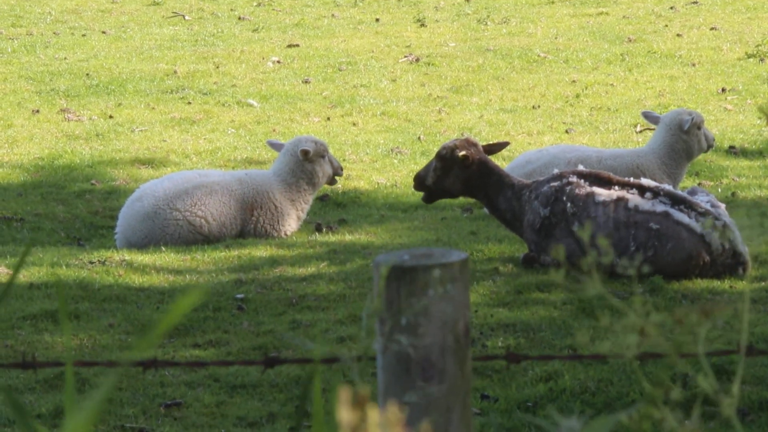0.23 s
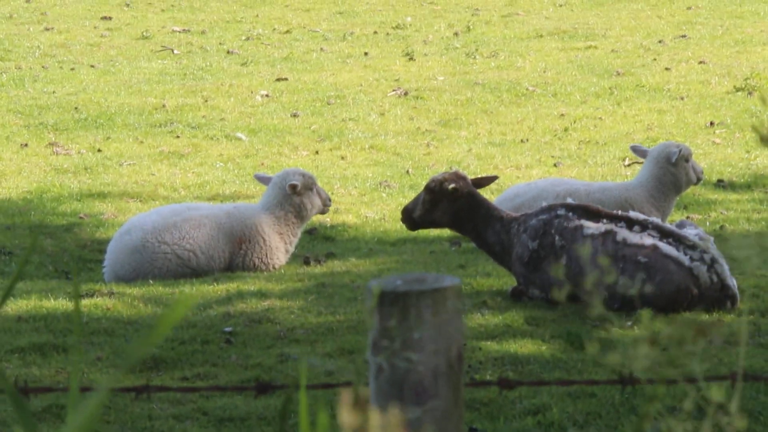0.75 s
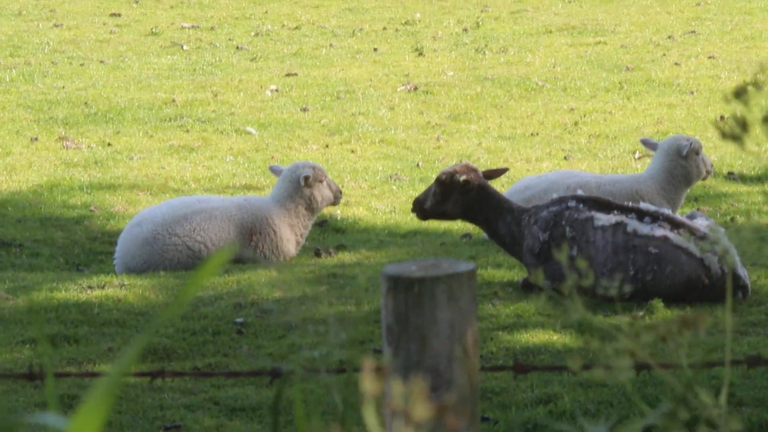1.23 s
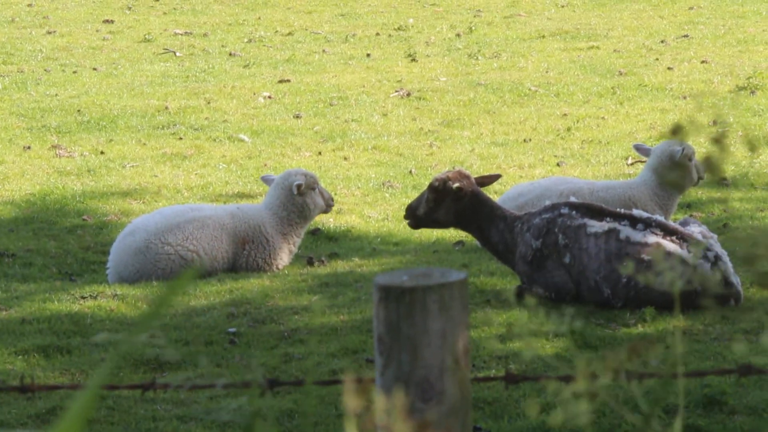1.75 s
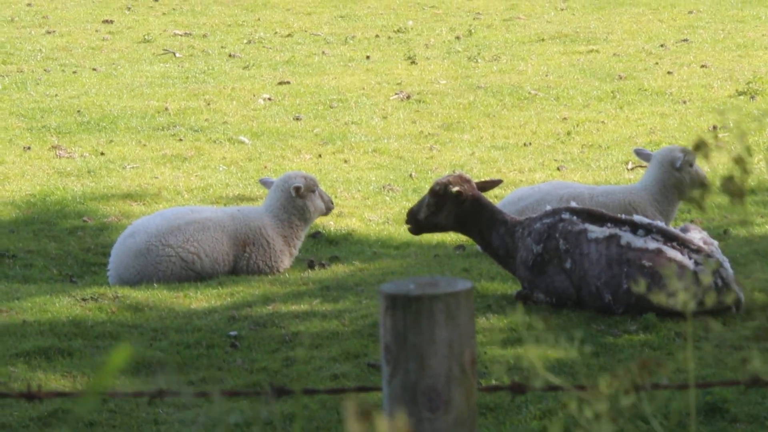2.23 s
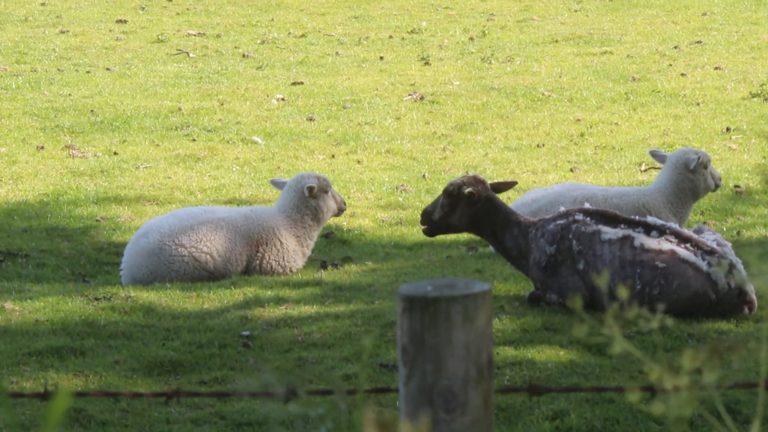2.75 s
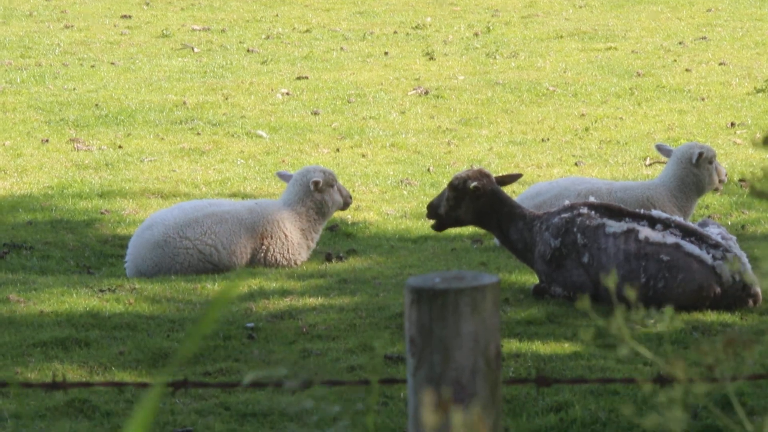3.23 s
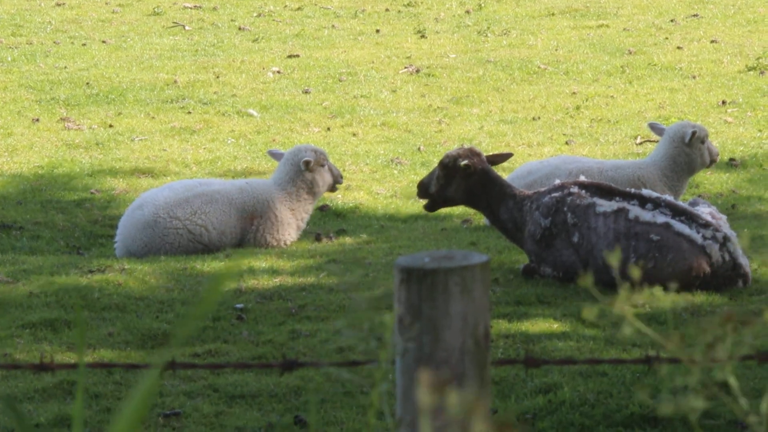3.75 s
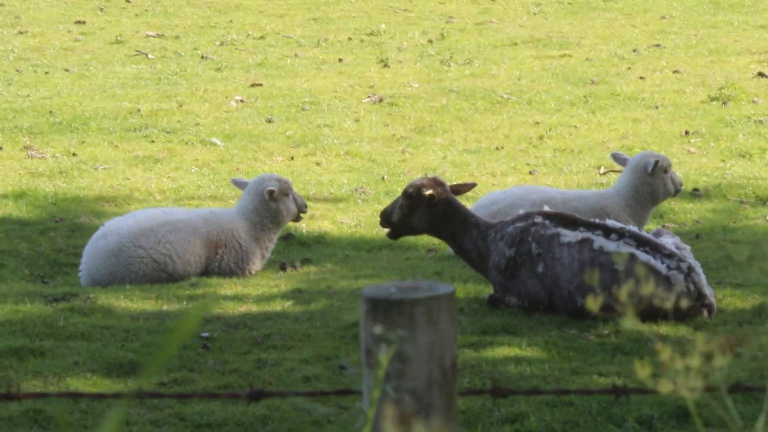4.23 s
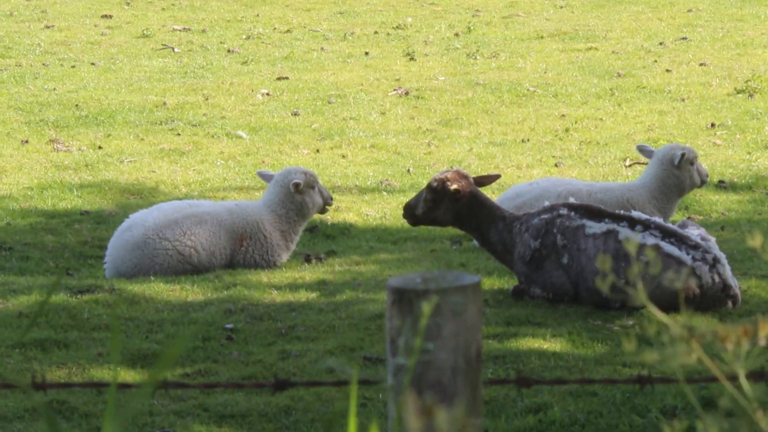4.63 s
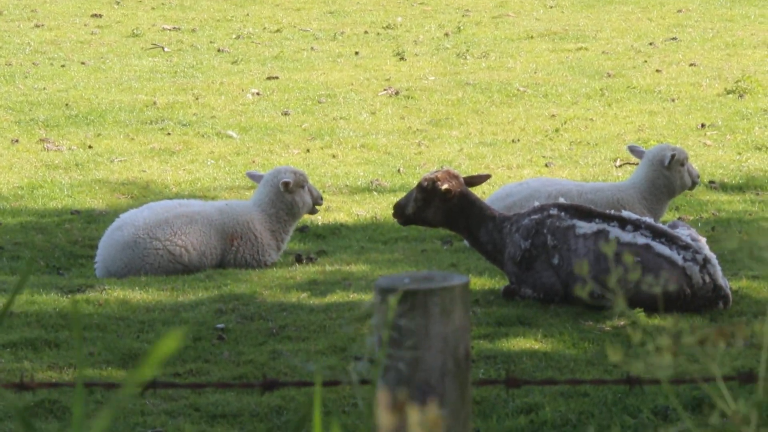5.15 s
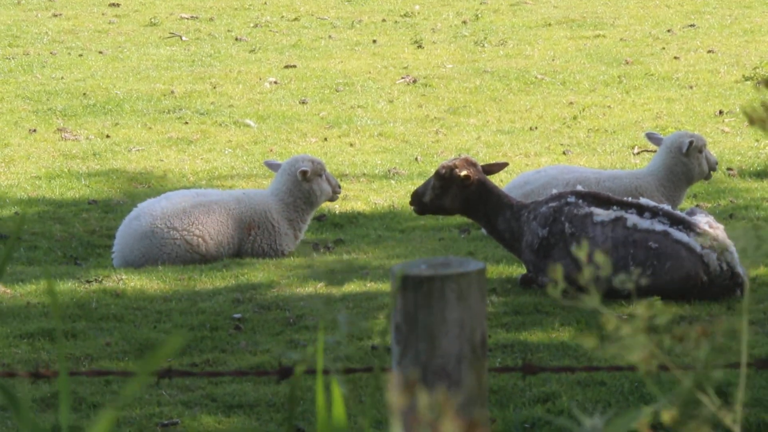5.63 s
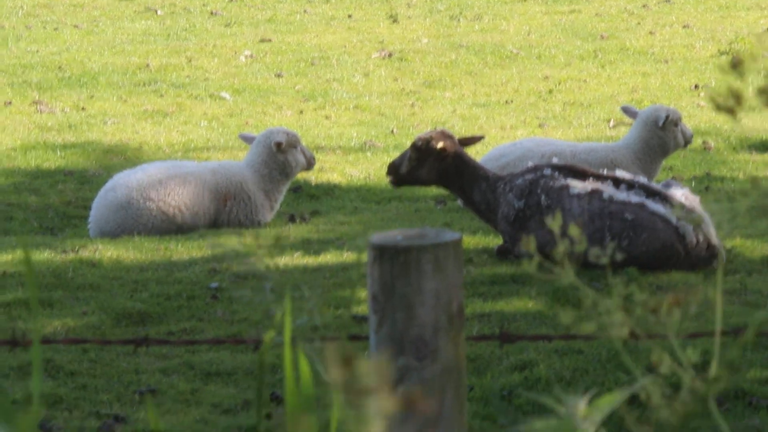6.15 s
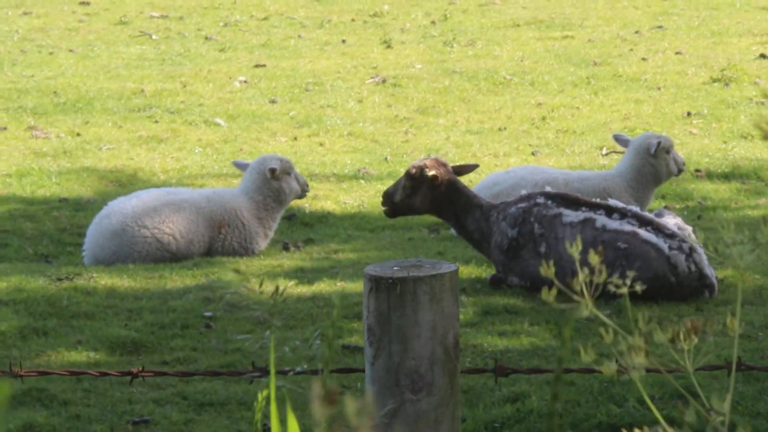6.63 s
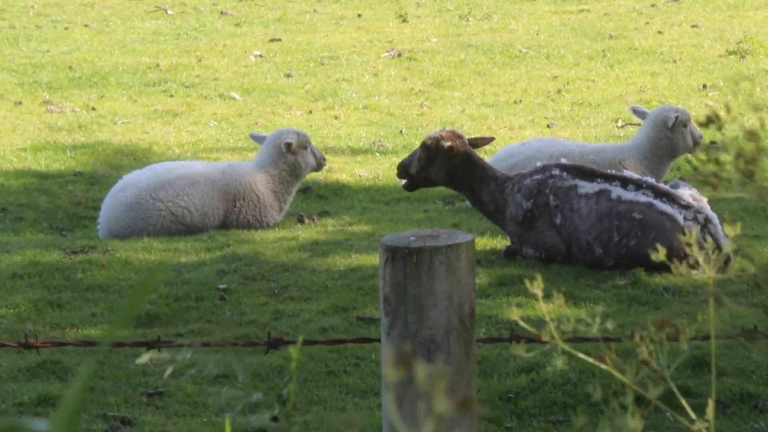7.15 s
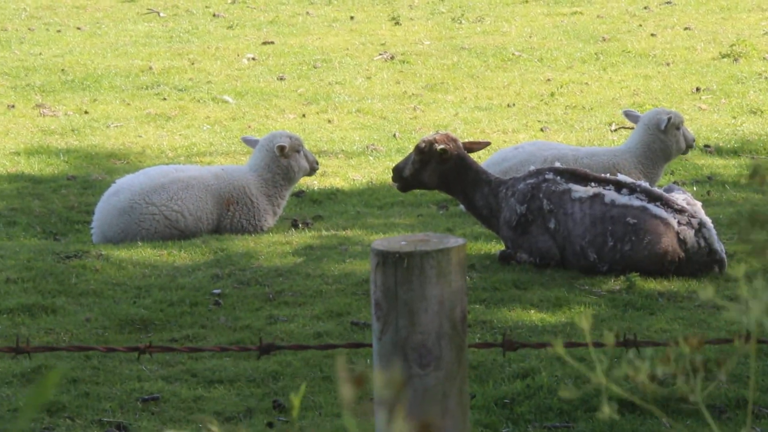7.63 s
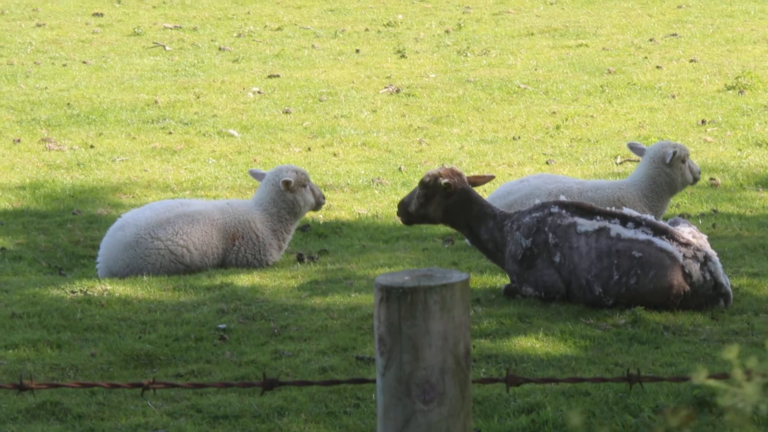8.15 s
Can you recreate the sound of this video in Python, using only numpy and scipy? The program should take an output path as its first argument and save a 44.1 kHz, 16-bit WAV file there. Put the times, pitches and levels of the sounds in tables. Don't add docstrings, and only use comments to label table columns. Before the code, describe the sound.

Outdoor stereo ambience close to an exposed small microphone. At first only low leafy rustle, light wind bumps and very faint chirps; then rough low-to-mid wind buffeting bursts in, irregular and sometimes overloading, with brief gaps. Clear thrush notes and thin trills from distant birds surface in the lulls mid-way. Later gusts crowd together and end in one long roaring blast while the field hiss sinks beneath it.

```python
import sys
import numpy as np
from scipy import signal
from scipy.fft import rfft, irfft, next_fast_len
from scipy.io import wavfile
from scipy.ndimage import uniform_filter1d, map_coordinates

SR = 44100
rng = np.random.default_rng(int(sys.argv[2]) if len(sys.argv) > 2 else 0)


def transcribe(signal):
    frames = np.atleast_2d(signal).T
    limited = np.clip(frames, -1, 1)
    pcm = np.round(limited * 32767).astype(np.int16)
    wavfile.write(sys.argv[1], SR, pcm)


def rack_gain(trim_db):
    fader = np.asarray(trim_db, float)
    return 10 ** (fader / 20)


N = 369999

# start_s, buffet_centre_hz at the reference strength, steady_flow_db between puffs
AIR = [(0, 386, -46), (.97, 305, -60), (2.1, 372, -52.5), (2.4, 253, -33), (2.51, 342, -36),
       (2.62, 475, -41), (3.1, 556, -35), (3.4, 462, -20), (3.6, 507, -32), (4.2, 395, -26.5),
       (4.9, 480, -26), (5.25, 358, -26), (5.65, 481, -52), (5.9, 402, -68), (6.7, 570, -17.5),
       (7.45, 417, -31), (7.95, 674, -30), (8.39, 810, -35)]
# full_strength_s, hold_s, level_db, left_right_db
PUFFS = [(0, .005, -43.5, 19), (.115, 0.013, -37.5, 8), (0.663, 0.02, -38.5, -6), (0.82, .005, -34, 6),
         (0.948, 0.036, -27, 0), (1.103, .005, -34.5, 1), (2.126, .005, -36, -8), (2.399, 0.14, -16.5, -1),
         (2.734, 0.088, -17.5, 5), (2.818, 0.47, -19, 3), (3.462, 0.15, -19, 0), (3.72, 0.019, -27, 0),
         (3.862, 0.025, -22, 0), (4.069, 0.02, -23, 6), (4.349, 0.19, -19.5, 3.5), (4.798, .12, -19, 0),
         (5.07, 0.0056, -16.5, 3), (5.193, 0.036, -23, 2.5), (5.371, .005, -27, -3),
         (5.463, 0.13, -20, -1.5), (5.599, 0.099, -17, -2.5), (5.818, .005, -21.5, -1),
         (5.943, 0.079, -16.5, 1.5), (6.112, .005, -30, -1), (6.22, 0.43, -18, -1), (6.635, .06, -25, 0),
         (6.885, 0.041, -23, 8), (6.974, 0.12, -19, -1.5), (7.21, 0.021, -22, 3), (7.536, 1, -17.5, 2)]
RISE_DB_PER_S, FALL_DB_PER_S = 198, 176
REFERENCE_DB, BRIGHTER_PER_DB = -19.5, .025
# full_depth_s, hold_s, depth_db
DUCKS = [(2.425, 0.12, 6), (2.772, 0.26, 13.5), (3.461, .005, 10.5), (3.567, 0.055, 7), (4.422, 0.078, 5.5),
         (4.907, .005, 3.5), (5.09, 0.0045, 7), (5.643, 0.066, 10.5), (6.051, 0.0083, 9.5),
         (6.464, 0.085, 7.5), (6.577, 0.0069, 13), (6.656, 0.19, 14), (7.066, 0.036, 9), (7.634, .005, 6.5),
         (7.737, .2, 15.5), (7.978, 0.53, 22), (8.28, .15, 20)]
DUCK_ATTACK_S, DUCK_RELEASE_S = 0.056, 0.051
RELEASE_PER_HOLD = 0.71
JOLT_HOLD_S, JOLT_ATTACK_S, JOLT_SHARE = .045, 0.0068, 0.58
# pitch_hz, level_db
EDDY = [(25, -66), (65, -22), (130, -8.5), (250, 0.5), (400, 2), (600, 1.5), (1000, -7.5), (1400, -19),
        (2000, -32), (3500, -60.5), (8000, -79), (20000, -100)]
# pitch_hz, level_db
LOW_CUT = [(20, -15), (60, -2.5), (110, 3.5)]
# pitch_hz for a centre of 500 Hz, burst_share
CLUMPED = [(100, 0.41), (250, 0.7), (600, 0.97), (1500, 1), (3000, 1)]
EVEN_DB, FLOWS_DB = 35, 14.5
FLICKER, FLICKERS_PER_S = 0.072, 110
# pitch_hz, left_right_likeness
PORTS_ALIKE = [(60, 0.99), (250, 0.94), (600, 0.22), (1500, 0.23)]
# middle_s, peak_db, left_right_db
SLAPS = [(2.389, -11, 21), (2.567, -12, -26), (2.718, -0.5, 27), (2.743, -3, -1), (3.104, 0, 16.5),
         (3.436, 9, -7), (3.449, 2.5, -9), (3.572, 5.5, 7.5), (3.614, -1, -22), (4.386, 3, 14),
         (4.425, -13, 25), (4.541, -1, 18), (5.033, 1.5, 27), (5.074, -2, 17), (2.51, -11, -20),
         (5.627, 0, 22), (5.684, -1, -40), (6.022, 1, -15), (6.241, -3.5, -3), (6.377, -4, 3),
         (6.412, 2, 12), (6.533, 2, -10), (6.674, 0, 10.5), (6.805, -1.5, -20), (7.052, 2, -10),
         (7.086, 1, -28), (7.259, -4, -5), (7.717, 1, 32), (7.878, -10, 12), (8.062, -8, 25)]
SLAP_SHARPER = 1.15
STRAY_OVER_DB, STRAY_SCATTER_DB, STRAY_PAN_DB = 9.5, 2, 13
STRAY_SINKS, WIND_ARRIVES_S = .12, 2.3
# start_s, length_s, first_pitch_hz, last_pitch_hz, level_db
THRUSH = [(3.3, 0.13, 1685, 1980, -43.5), (3.475, 0.14, 1756, 1927, -46.5),
          (3.755, 0.14, 1897, 2067, -39.5), (3.875, 0.086, 2090, 1950, -37),
          (4.155, 0.097, 2110, 1900, -40), (4.28, 0.085, 1846, 1810, -39.5), (4.46, 0.099, 2200, 2060, -51),
          (5.2, 0.12, 2090, 2140, -43.5), (5.335, .085, 1890, 1800, -39), (5.535, 0.028, 2110, 2030, -34.5)]
# start_s, length_s, first_pitch_hz, last_pitch_hz, level_db
WARBLE = [
    (5.27, .07, 2080, 1880, -40),
    (5.505, .13, 2180, 1900, -45),
]
# start_s, length_s, first_pitch_hz, last_pitch_hz, level_db
PIPING = [(.12, .05, 2410, 2450, -63), (.49, 0.11, 2000, 1810, -59), (.74, .04, 2600, 2510, -65),
          (.8, .05, 2510, 2560, -59), (.88, .05, 2550, 2510, -62), (4.955, 0.087, 2814, 2710, -48),
          (3.99, .03, 3950, 4120, -54), (4.88, .06, 3170, 3210, -58), (4.97, .07, 3190, 3130, -55)]
# start_s, length_s, first_pitch_hz, last_pitch_hz, level_db
SEEP = [
    (6.11, .07, 6950, 6870, -53),
]
ARCH, START_UNDER_DB, END_UNDER_DB = 1.005, 3, 3.5
# start_s, blip_db, slur_db
TRILL = [(3.2, -53, -53), (3.298, -47, -48), (3.392, -49, -49), (3.484, -55, -54), (3.662, -53, -58),
         (3.75, -47, -57), (3.85, -48, -58), (4.045, -56, -52)]
# after_start_s, pitch_hz
SYLLABLE = [
    [(-.008, 3370), (0, 3460), (.01, 3540)],
    [(.008, 2925), (.022, 2850), (.036, 2540)],
]
# pitch_hz, density_db per Hz
FIELD = [(25, -33), (100, -28), (260, -4.5), (700, -3.5), (1100, -5), (1500, -7.5), (3000, -11),
         (4700, -13.5), (5500, -18.5), (8000, -18.5), (9500, -22.5), (10800, -27), (13000, -27),
         (15600, -33)]
# pitch_hz, left_right_likeness
FIELD_ALIKE = [(60, .9), (300, 1), (1000, 0.37), (3000, 0.025)]
# pitch_hz, left_right_db
FIELD_TILT = [(100, 5.5), (2000, -2), (12000, -1.5)]
# start_s, added_db under 3 kHz
DRONE = [(0, 5), (1.1, 2), (2.2, 1), (5, 0.5), (8.39, -2)]
HISS_DB, HISS_STARTS_UNDER_DB, HISS_SWELL_S, HISS_SWELL_SHAPE = -49, 11, 2.72, 1.62
LEFT_RIGHT = np.array([[.5], [-.5]])


def air(t):
    centre_hz, steady_db = curves(AIR, t)
    start, hold, db, pan_db = np.transpose(PUFFS)
    before, after = plateaus(start, hold, t)
    power = rack_gain(2 * (db[:, None] - RISE_DB_PER_S * before - FALL_DB_PER_S * after))
    total = power.sum(0) + rack_gain(2 * steady_db)
    level_db = 10 * np.log10(total)
    hole_db = JOLT_SHARE * ducking(t, JOLT_ATTACK_S, JOLT_HOLD_S)
    brighter = np.exp(BRIGHTER_PER_DB * (level_db - REFERENCE_DB))
    return level_db - hole_db, centre_hz * brighter, pan_db @ power / total


def ducking(t, attack_s=DUCK_ATTACK_S, longest_s=np.inf):
    start, hold, depth_db = np.transpose(DUCKS)
    before, after = plateaus(start, hold, t)
    release_s = DUCK_RELEASE_S + RELEASE_PER_HOLD * hold[:, None]
    grip = np.maximum(1 - before / attack_s - after / release_s, 0)
    counted_db = depth_db * (hold < longest_s)
    return np.max(counted_db[:, None] * grip, 0)


def buffeting():
    t = np.arange(N) / SR
    grid = np.arange(0, N + 64, 64) / SR
    level_db, centre_hz, pan_db = [np.interp(t, grid, c) for c in air(grid)]
    ducked_db = np.interp(t, grid, ducking(grid))
    clumps_db = 3 * wobble(45) + 6.9 * wobble(110) + 3 * wobble(300) + 4.14 * wobble(900)
    clumps_db = 12 * np.tanh(clumps_db / 12)
    clumps_db *= 1.195 * (centre_hz / 500) ** -.35 * np.exp(-ducked_db / EVEN_DB)
    push = rack_gain(clumps_db) * rng.standard_normal((2, N))
    push /= np.sqrt(np.abs(uniform_filter1d(np.mean(push ** 2, 0), int(.07 * SR))) + 1e-9)
    hz, frames, bursts = spectra(push)
    flow = spectra(rng.standard_normal((2, N)))[2]
    flicker = np.interp(frames, t, wobble(FLICKERS_PER_S))
    centre_hz = air(frames)[1] * np.exp(FLICKER * flicker)
    share = np.clip(along(CLUMPED, hz * 500 / centre_hz), 0, 1) ** (1 + ducking(frames) / FLOWS_DB)
    colour = eddy_colour(hz, centre_hz)
    colour /= np.sqrt(np.mean(colour ** 2, 0))
    lead = 2 * np.pi * (hz + 250) * 0.00026 * np.interp(frames, t, wobble(12))
    common, apart = colour * (np.sqrt(share) * bursts + np.sqrt(1 - share) * flow)
    pair = stereo(common, apart, along(PORTS_ALIKE, hz), lead)
    own_db = 3.0 * wobble(50)
    return pair * rack_gain(level_db - 0.5 + LEFT_RIGHT * (pan_db + own_db))


def eddy_colour(hz, centre_hz):
    speed = centre_hz / 500
    spread = np.maximum(speed, .75) ** -.4
    return rack_gain(along(EDDY, hz / speed) * spread + along(LOW_CUT, hz))


def slaps():
    out, hz = np.zeros((2, N + SR)), np.fft.rfftfreq(2048, 1 / SR)
    rows = list(SLAPS) + strays(count=130)
    centres_hz = SLAP_SHARPER * air(np.transpose(rows)[0])[1]
    chances = rng.standard_normal((len(rows), 3))
    for (s, db, pan_db), centre_hz, (turn, lag, smear) in zip(rows, centres_hz, chances):
        shape = eddy_colour(hz, 1.035 * centre_hz) ** 1.146 * (hz / centre_hz) ** 0.57
        delay_s = 1024 / SR + np.array([[0], [.0003 * lag]])
        dispersion = 1.68 * smear * np.log(hz / centre_hz + 0.046) ** 2
        twist = 2 * turn + np.array([[0], [.5 * lag]]) + dispersion
        swing = irfft(shape * np.exp(1j * twist - 2j * np.pi * hz * delay_s))
        peak_db = np.minimum(db - 1.5 + pan_db * LEFT_RIGHT, max(db, -2.5))
        swing *= rack_gain(peak_db) / np.abs(swing).max()
        out[:, round(s * SR):][:, :swing.shape[1]] += swing
    return out[:, 1024:N + 1024]


def strays(count):
    when = rng.uniform(WIND_ARRIVES_S, N / SR, count)
    size, side = rng.standard_normal((count, 2)).T
    wind_db = air(when)[0] - STRAY_SINKS * ducking(when)
    peak_db = wind_db + STRAY_OVER_DB + STRAY_SCATTER_DB * size
    return list(zip(when, peak_db, STRAY_PAN_DB * side))


def birds():
    thrush = whistles(arched(THRUSH), 0.0056, pan_db=9.0)
    small = whistles(arched(PIPING) + trill(), 0.014, pan_db=-23.0)
    seep = whistles(arched(SEEP), 0.014, pan_db=.5)
    return thrush + small + seep + whistles(arched(WARBLE), 0.045, pan_db=8)


def whistles(notes, waver, pan_db):
    t, out = np.arange(N) / SR, np.zeros(N)
    bend, flutter_db = 1 + waver * wobble(70), 2.2 * wobble(60)
    for note in notes:
        start, end = note[0][0], note[-1][0]
        span = slice(round(start * SR), round(end * SR))
        pitch_hz, level_db = curves(note, t[span])
        ends = np.clip(np.minimum(t[span] - start, end - t[span]) / .012, 0, 1)
        phase = 2 * np.pi * np.cumsum(pitch_hz * bend[span]) / SR
        out[span] += ends * rack_gain(level_db + 3.0 + flutter_db[span]) * np.sin(phase)
    after = t[:SR // 3]
    tail = rng.standard_normal((2, len(after))) * rack_gain(-60 * after / .25) * (after > .02)
    wet = signal.fftconvolve(out[None], tail / np.linalg.norm(tail[0]), axes=1)[:, :N]
    return out * rack_gain(pan_db * LEFT_RIGHT) + rack_gain(-3) * wet


def arched(rows):
    notes = []
    for s, length, a_hz, b_hz, db in rows:
        first = (s, a_hz, db - START_UNDER_DB)
        middle = (s + length / 2, ARCH * (a_hz + b_hz) / 2, db)
        notes.append([first, middle, (s + length, b_hz, db - END_UNDER_DB)])
    return notes


def trill():
    notes = []
    for s, *levels in TRILL:
        for part, db in zip(SYLLABLE, levels):
            notes.append([(s + dt, hz, db) for dt, hz in part])
    return notes


def field():
    hz, frames, z = spectra(rng.standard_normal((2, N)))
    patches = uniform_filter1d(uniform_filter1d(rng.standard_normal(z.shape[1:]), 14, 0), 12, 1)
    colour = rack_gain(along(FIELD, hz))
    colour /= np.sqrt(np.mean(colour ** 2 * (hz > 5500) * (hz < 12000)))
    swell_db = HISS_DB - HISS_STARTS_UNDER_DB * np.exp(-(frames / HISS_SWELL_S) ** HISS_SWELL_SHAPE)
    drone_db = curves(DRONE, frames)[0] / (1 + (hz / 3000) ** 4)
    level_db = swell_db - ducking(frames) + drone_db
    common, apart = z * colour * rack_gain(level_db + 1.5 + 1.2 * unit(patches))
    pair = stereo(common, apart, along(FIELD_ALIKE, hz))
    wide = 2 * SR * 5
    tilt_db = LEFT_RIGHT * along(FIELD_TILT, np.fft.rfftfreq(wide, 1 / SR))
    return irfft(rfft(pair, wide) * rack_gain(tilt_db))[:, :N]


def stereo(common, apart, alike, lead=0):
    turn = np.arccos(np.clip(alike, -1, 1)) / 2
    mid, side, shift = common * np.cos(turn), apart * np.sin(turn), np.exp(.5j * lead)
    pair = np.array([(mid + side) * shift, (mid - side) / shift])
    return signal.istft(pair, SR, nperseg=1024, noverlap=768)[1][:, :N]


def spectra(x):
    hz, t, z = signal.stft(x, SR, nperseg=1024, noverlap=768)
    return hz[:, None], t, z


def plateaus(start, hold, t):
    start, end = start[:, None], (start + hold)[:, None]
    return np.maximum(start - t, 0), np.maximum(t - end, 0)


def wobble(rate):
    knots = rng.standard_normal(int(N * rate / SR) + 4)
    return map_coordinates(knots, [np.arange(N) * rate / SR])


def along(points, hz):
    f, v = np.transpose(points)
    return np.interp(np.log(hz + 1), np.log(f + 1), v)


def curves(rows, t):
    s, *cols = np.transpose(rows)
    return [np.interp(t, s, c) for c in cols]


def unit(x):
    return x / np.sqrt(np.mean(x ** 2) + 1e-20)


def scene():
    lone = slaps()
    room_left = 1 / (1 + 6 * uniform_filter1d(np.abs(lone), 300, axis=1))
    return buffeting() * room_left + lone + field() + birds()


def roll_off(x):
    return signal.sosfilt(signal.butter(12, 15750, fs=SR, output="sos"), x)


def record(dry):
    clipped = dry / (1 + np.abs(dry) ** 20) ** (1 / 20)
    clipped = clipped * np.clip(np.arange(N, 0, -1) / 60, .4, 1)
    wide = next_fast_len(N + SR // 10)
    passed = np.fft.rfftfreq(wide, 1 / SR) < 15770
    kept = irfft(rfft(clipped, wide) * passed, wide)[:, :N]
    return roll_off(kept)


dry = scene()
out = record(dry)
transcribe(out)
```